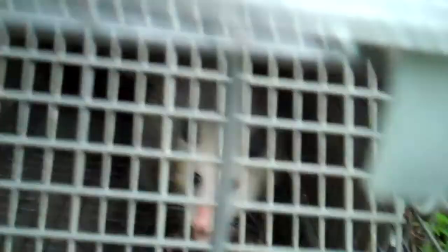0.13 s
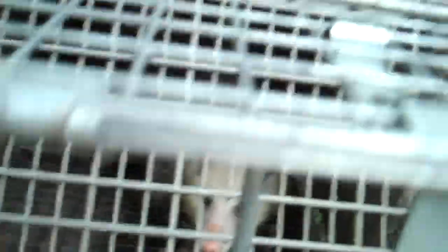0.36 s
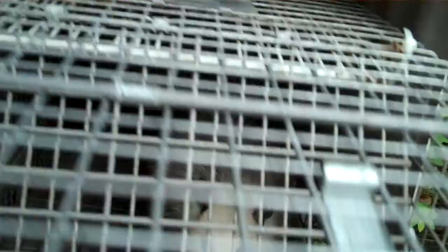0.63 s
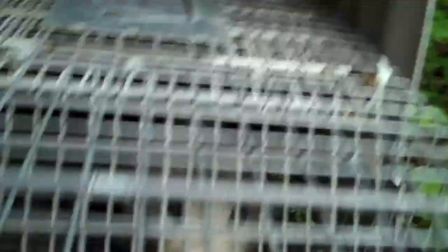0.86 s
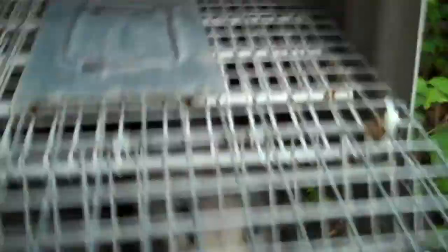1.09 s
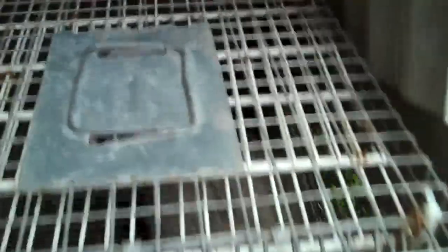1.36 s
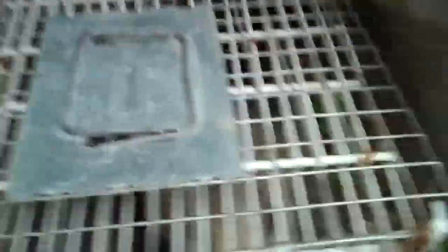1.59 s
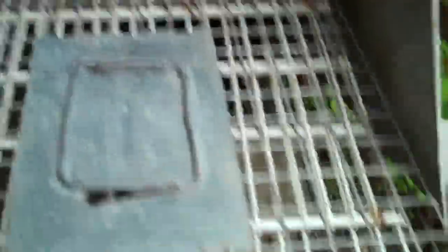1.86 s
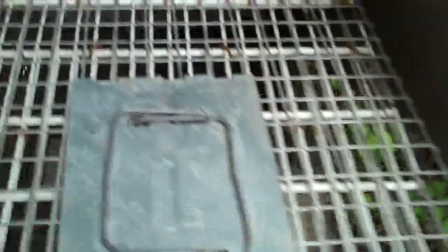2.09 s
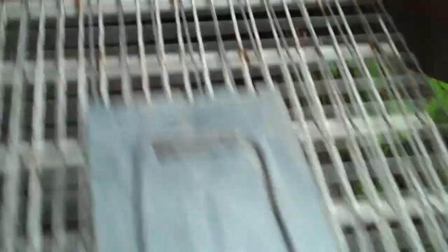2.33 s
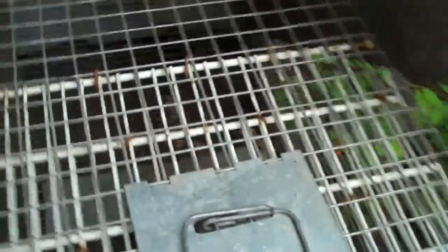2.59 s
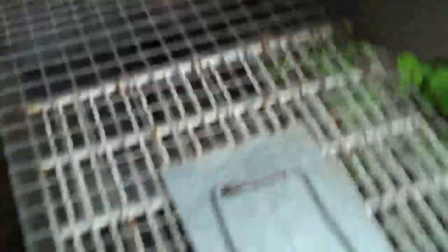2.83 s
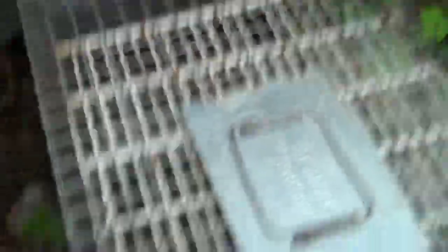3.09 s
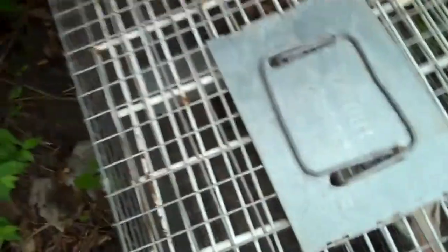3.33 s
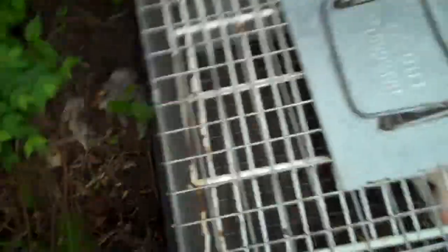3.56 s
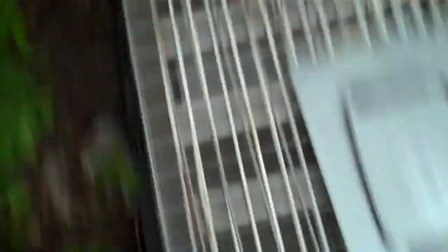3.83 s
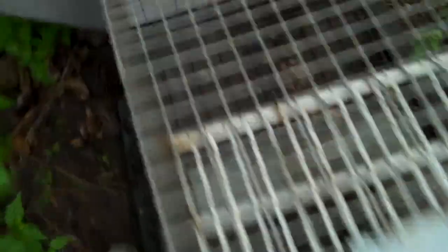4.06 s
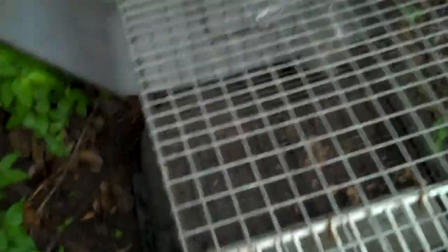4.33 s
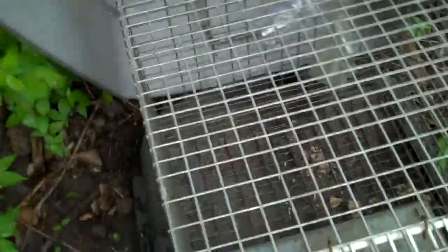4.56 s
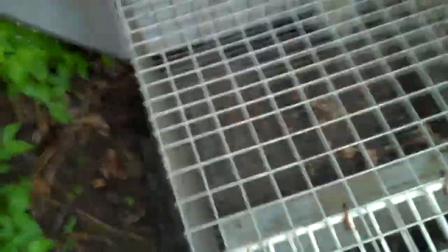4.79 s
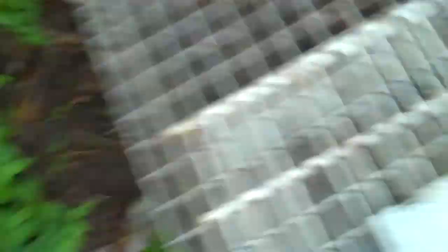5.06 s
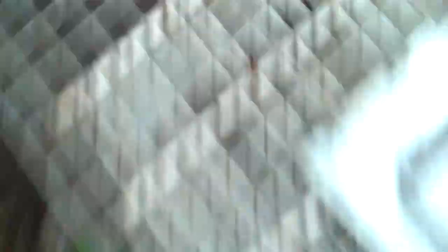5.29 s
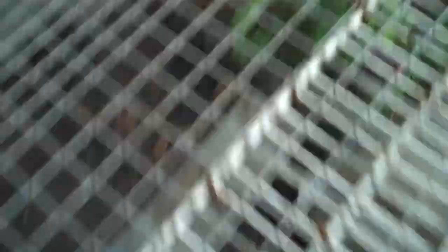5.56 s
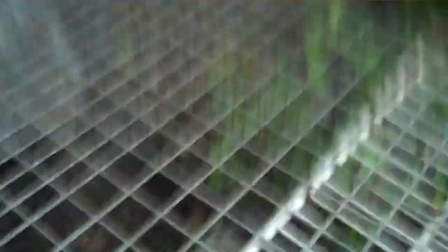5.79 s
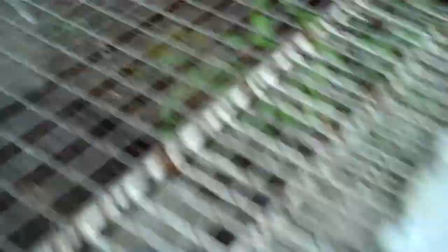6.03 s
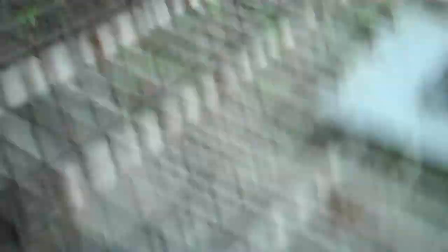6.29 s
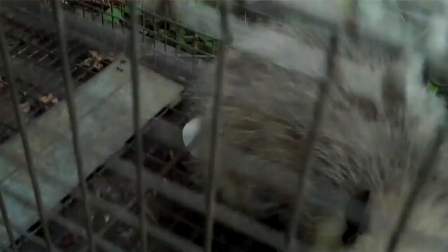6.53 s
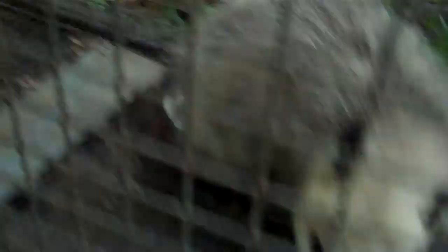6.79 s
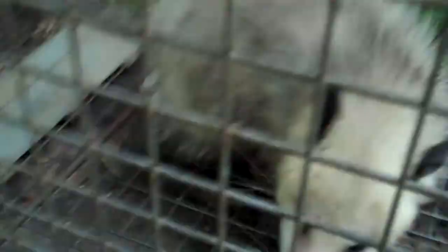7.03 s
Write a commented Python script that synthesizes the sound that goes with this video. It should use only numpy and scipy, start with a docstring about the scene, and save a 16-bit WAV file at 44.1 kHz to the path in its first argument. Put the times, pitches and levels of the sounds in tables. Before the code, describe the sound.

A wire cage is carried through long grass, with dry swishes, crackling ticks, dull frame thuds and a muffled finger creaking on the microphone.

```python
"""A wire cage is lifted and carried through long grass, heard by a hand-held camera.
It opens on a grass sweep and mesh rubs; thuds of the ringing frame and knocks on the wires soon join in.
Something hollow slides by near 3.9 s, the hardest thud falls at 4.3 s, and the grass is loudest from 5.2 to 5.9 s.
Bright stem ticks crowd the end. Sweeps and rubs are shaped noise, clicks are noise bursts, thuds are decaying sines.
Right: an open port ringing near 6 kHz. Left: a port muffled by a finger, which creaks throughout and taps
now and then from 1.6 s on."""
import sys
import numpy as np
from scipy import signal
from scipy.fft import rfft, irfft
from scipy.io import wavfile
from scipy.ndimage import uniform_filter1d

SR = 44100
rng = np.random.default_rng(int(sys.argv[2]) if len(sys.argv) > 2 else 0)


def to_linear_factor(level_db):
    """Convert decibel levels (scalar or array-like) to linear amplitude factors."""
    exponent = np.asarray(level_db, float) / 20
    return 10 ** exponent


def bounce(signal):
    """Save signal as a 16-bit WAV file at the path given by the first command-line argument."""
    frames = np.transpose(np.atleast_2d(signal))
    limited = np.clip(frames, -1, 1)
    pcm = np.round(limited * 32767).astype(np.int16)
    wavfile.write(sys.argv[1], SR, pcm)


N = 315315

# All source levels are ahead of the port and the output gains.
# Capsule self noise. Each row: frequency in Hz, density in dB per Hz.
HISS_SPECTRUM = [(40, -87.5), (100, -91), (300, -91.5), (800, -93), (2000, -97), (5000, -101), (9000, -105),
                 (13000, -107)]
# Finger rubbing on the left port. Each row: time in seconds, level in dB.
FINGER_RUB = [(0.0, -71), (0.5, -82), (1.0, -61), (2.3, -79), (3.3, -68), (4.0, -77), (4.5, -84.5),
              (5.0, -64), (6.0, -56), (7.15, -71)]
# Loudest finger taps. Each row: time in seconds, strength in dB of the impulse that rings the cavity.
FINGER_TAPS = [(1.634, -3), (1.783, -2.5), (5.059, -2), (5.511, -12), (5.799, -8), (6.011, -8), (6.065, -5),
               (6.313, 5), (6.359, -8), (6.916, -15)]
# Something hollow slides along the cage. Each row: peak in seconds, level in dB, rise and fall in seconds per 10 dB.
SLIDES = [(3.91, -47.5, 0.14, .16)]
# Its resonances. Each row: frequency in Hz, width in Hz, level in dB.
HOLLOW_MODES = [(610, 320, 1.5), (1400, 510, 1), (1900, 100, -5.5)]
# The mesh panel is rubbed. Each row: peak in seconds, level in dB, rise and fall in seconds per 10 dB.
MESH_RUBS = [(.1, -41.5, 0.073, 0.02), (.38, -46.5, 0.05, -0.35), (.7, -50.5, 0.3, 0.18),
             (4.25, -38, 0.033, -0.41)]
# The frame shakes as it is shifted or drags. Each row: peak in seconds, rumble in dB, rise and fall in s per 10 dB.
FRAME_SHAKES = [(.05, -44, 0.1, 0.19), (.37, -54, .1, 0.08), (.78, -43, 0.15, 0), (1.36, -51, 0.32, -0.02),
                (1.92, -36, 0.08, 0.0859), (2.84, -59, .02, 0.16), (3.28, -60, 0.12, .15),
                (3.8, -51, .12, .1), (4.33, -39, 0.044, -0.07), (4.78, -51, 0.13, -0.1),
                (5.09, -43.5, .04, -0.15), (5.3, -44, 0.074, 0.2), (5.79, -44.5, 0.099, 0.2),
                (6.12, -58, 0.16, 0)]
# Blows on the frame. Each row: start in seconds, level in dB, settled pitch in Hz.
BLOWS = [(0.752, -27, 398), (0.789, -24, 141), (1.899, -25, 104), (1.96, -25.5, 103), (2.002, -22.5, 407),
         (2.03, -35, 75), (2.822, -23.5, 269), (2.84, -39.5, 80.4), (3.107, -35.5, 354),
         (3.572, -29.5, 493), (3.775, -17.5, 250), (4.274, -22, 290), (4.308, -14.5, 210.5),
         (4.349, -23, 216), (4.37, -34.5, 84.3), (4.578, -34.5, 296), (4.674, -19.5, 255),
         (4.699, -31.5, 127), (4.79, -40, 95), (6.517, -44, 105), (6.66, -41.5, 214)]
# Frame modes. Each row: multiple of the settled pitch, level in dB, share of the blow's 60 dB decay time.
FRAME_MODES = [(.6, -2, 0.49), (1.007, -5.5, 1.23), (2.05, -3, 0.3), (3.3, -4.5, 0.21)]
# Loudest bright ticks of stems on wire. Each row: start in seconds, peak of the sharp part in dB.
STEM_TICKS = [(0.672, -27), (0.684, -26.5), (0.705, -26), (0.8258, -31.5), (0.9122, -30), (1.093, -28),
              (1.2825, -23.5), (1.367, -25), (1.4988, -24), (2.0522, -26), (2.6396, -23.5), (5.2027, -26),
              (5.2305, -16.5), (5.2483, -11), (5.3323, -15), (5.8195, -11), (5.8974, -14.5), (6.001, -23),
              (6.0128, -17.5), (6.0434, -12), (6.1204, -11.5), (6.132, -15), (6.1573, -14.5), (6.2222, -17),
              (6.327, -18), (6.3505, -20), (6.562, -22), (6.5842, -21.5), (6.5963, -23), (6.6157, -25),
              (6.6573, -30), (6.7907, -26.5), (6.8261, -21), (6.9107, -28), (6.995, -26), (7.0336, -24.5)]
# Knocks on the wires. Each row: start in seconds, sharp peak in dB, dull peak in dB, dull centre in Hz.
WIRE_KNOCKS = [(0.3227, -52, -28.5, 1590), (0.3671, -43, -26.5, 1100), (0.757, -50, -24.5, 597),
               (0.786, -50, -28, 680), (0.9848, -25, -29, 1660), (1.0322, -24.5, -31, 1200),
               (1.412, -22, -24, 1400), (1.4388, -19.5, -34.5, 2200), (1.6308, -20, -26.5, 1600),
               (1.8588, -34, -14.5, 2870), (1.879, -25, -29, 2500), (1.894, -32, -33, 3000),
               (1.913, -37, -26.5, 3480), (1.9424, -25, -21, 2000), (1.955, -32, -19.5, 1070),
               (2.006, -36, -26, 800), (2.1632, -29, -34, 2000), (2.4554, -32, -29.5, 2960),
               (2.4717, -40, -32, 1400), (2.8225, -34, -24.5, 1100), (3.1129, -47, -28.5, 734),
               (3.2986, -24, -24, 1100), (3.4264, -18, -22, 2570), (3.7772, -27, -13.5, 1200),
               (4.3039, -19, -8.5, 1420), (4.5743, -32, -26, 1900), (4.915, -42, -26.5, 1290),
               (5.2709, -8, -20, 1100), (5.354, -15, -25, 1100), (5.4372, -32, -23.5, 1090),
               (5.4861, -9.5, -15, 1980), (5.666, -14.5, -17, 1310), (6.0572, -17, -25.5, 1080),
               (6.3001, -22, -32.5, 1000), (6.9152, -27, -31.5, 1400), (7.0042, -21, -26.5, 1290)]
# How the grass moves over the mesh. Each row: time in seconds, smoothness from 0 dry ticks to 1 dragging swish.
SMOOTHNESS = [(0, 0.55), (.85, 0.62), (1.0, 0.38), (1.7, 0.38), (2.3, 0.65), (3.3, 0.33), (4.5, 0.64),
              (5.1, 0.43), (5.85, 0.44), (6.0, 0.29), (7.15, 0.14)]
# Sweeps through the grass. Each row: peak in seconds, blade rustle in dB, rise and fall in seconds per 10 dB,
# stem scrape in dB above the rustle.
GRASS_SWEEPS = [(0.0, -35.5, 0.059, 0.07, -3.5), (0.069, -33, 0.0086, 0.05, -3),
                (.16, -46, 0.098, 0.2, -1.5), (0.37, -43, .1, 0.04, -4), (0.757, -39.5, 0.17, 0, -3.5),
                (0.861, -42.5, 0.028, -0.23, -8), (1.2, -36.5, 0.21, 0.16, -7.5),
                (1.399, -35, 0.056, 0.06, -8.5), (1.63, -38, 0.19, 0.21, -11),
                (1.88, -37, .03, 0.0766, 2.5), (1.99, -35, 0.072, 0.12, -10),
                (2.48, -41.5, 0.24, 0.28, -12.5), (2.84, -44.5, 0.093, 0.2, -13.5),
                (3.262, -33, 0.094, 0.14, -10.5), (3.668, -29, 0.081, 0.13, -11),
                (4.3, -38, 0.27, 0.35, -7.5), (4.67, -33.5, 0.015, -0.07, -7),
                (4.761, -31, 0.054, 0.06, -12.5), (4.881, -39.5, 0.17, 0.03, -12),
                (4.919, -43.5, 0.028, 0.02, 1.5), (5.092, -31.5, 0.034, -0.03, -6.5),
                (5.3, -22.5, .11, 0.1575, -8), (5.751, -21.5, .11, 0.13, -9.5),
                (6.12, -31.5, 0.16, 0.32, -11.5), (6.57, -39, 0.26, 0.02, -11),
                (6.72, -45, 0.064, .06, -10.5), (7.01, -42, 0.21, 0.05, -11)]
# Blade rustle by range. Each row: low edge in Hz, high edge in Hz, level in dB.
RUSTLE_BANDS = [(2410, 4530, -10.5), (4020, 8080, -11.0), (8200, 19845, -7.5)]
# Stem scrape by range. Each row: low edge in Hz, high edge in Hz, level in dB, extra dB per dB of scrape above -9.
SCRAPE_BANDS = [(339, 1210, -3, 0.48), (1026, 2590, -2.0, -0.094)]

STIR_DB, STIR_SCRAPE_DB, STIR_RUMBLE_DB = -56, -6, -68.5  # faint stirring; the scrape is relative to the rustle
THUD_T60_S, THUD_T60_SLOPE, THUD_SWELL_S = 0.085, 0.82, 0.0034  # times at 250 Hz; lower blows ring longer
TICK_DULL_DB, TICK_DULL_HZ = -20, 1400  # dull part of a tick, relative to its sharp peak
DULL_SPAN = 1.91  # the dull part reaches from its centre over this to its centre times this
PORT_HZ, PORT_WIDTH_HZ, PORT_DB = 6030, 1060, 17  # cavity resonance of the open port
COVER_HZ, COVER_TOP_HZ = 80.5, 1200  # low-passes for what leaks past the finger
OVERLOAD = 0.84  # full-scale share where the right side saturates


def band(x, low_hz, high_hz):
    """Butterworth band-pass."""
    return signal.sosfilt(signal.butter(2, [low_hz, high_hz], "band", fs=SR, output="sos"), x)


def one_pole(x, hz):
    """Gentle low-pass."""
    r = np.exp(-2 * np.pi * hz / SR)
    return signal.lfilter([1 - r], [1, -r], x)


def resonance(x, hz, width_hz):
    """Two-pole resonance with a gain of about 1 at its top."""
    r = np.exp(-np.pi * width_hz / SR)
    poles = [1, -2 * r * np.cos(2 * np.pi * hz / SR), r * r]
    return signal.lfilter([(1 - r * r) / 2, 0, (r * r - 1) / 2], poles, x)


def in_time(rows):
    """Second table column as a curve over time, one value a sample."""
    s, values = np.transpose(rows)
    return np.interp(np.arange(N) / SR, s, values)


def evened(x, over_s):
    """Local rms brought to 1."""
    power = np.abs(uniform_filter1d(x ** 2, size=int(over_s * SR)))
    return x / np.sqrt(power + 1e-14)


def swells(rows):
    """Level in dB of each row over time: a steady climb to its peak, then a steady fall."""
    s, db, rise_s, fall_s = (np.array(rows)[:, k:k + 1] for k in range(4))
    t = np.arange(0, N + 64, 64) / SR - s  # one value per 64 samples
    fall_s = np.maximum(fall_s, 0.005)  # zero or negative entries drop abruptly
    return db - 10 * np.where(t < 0, -t / rise_s, t / fall_s)


def summed(levels_db, rest_db):
    """Powers of all swells and a resting level added, in dB, one value a sample."""
    power = np.sum(to_linear_factor(levels_db) ** 2, axis=0) + to_linear_factor(rest_db) ** 2
    total_db = 10 * np.log10(power)
    return np.interp(np.arange(N) / 64, np.arange(len(total_db)), total_db)


def grains(per_s, spread_db, last_s):
    """Envelope of random short bursts; a few are much larger, and they come in clumps."""
    clumps = evened(one_pole(one_pole(rng.standard_normal(N), 25), 25), 1)
    born = rng.random(N) < per_s * to_linear_factor(6.0 * clumps) / SR
    sizes = to_linear_factor(spread_db * np.minimum(rng.exponential(1, N), 4.2))
    return signal.lfilter([1], [1, -np.exp(-1 / (last_s * SR))], born * sizes + 1e-9)


def hiss():
    """Self noise of the capsule: steady noise shaped to its spectrum."""
    hz, db = np.transpose(HISS_SPECTRUM)
    grid_hz = np.linspace(1, SR / 2, N // 2 + 1)
    shape = to_linear_factor(np.interp(np.log(grid_hz), np.log(hz), db)) * np.sqrt(SR / 2)
    return irfft(rfft(rng.standard_normal(N)) * shape, N)


def finger():
    """Skin creaks in clumped slips and taps on the small cavity under the finger, which resonates."""
    slips = grains(190.0, 2.6, 0.002) * rng.standard_normal(N)
    creak = evened(resonance(resonance(slips, 650, 400), 720, 900), 0.39)
    taps = np.zeros(N)
    for s, db in FINGER_TAPS:
        taps[round(s * SR)] = to_linear_factor(db)
    return to_linear_factor(in_time(FINGER_RUB)) * creak + resonance(one_pole(taps, 1400), 410, 780)


def slide():
    """Sliding friction noise excites a few hollow resonances."""
    friction = rng.standard_normal(N)
    modes = np.zeros(N)
    for hz, width_hz, db in HOLLOW_MODES:
        mode = resonance(resonance(friction, hz, width_hz), hz, width_hz)
        modes += to_linear_factor(db) * evened(mode, 0.58)
    return to_linear_factor(summed(swells(SLIDES), -99)) * modes


def panel():
    """Rubbing the mesh panel puts friction noise through one narrow mode."""
    mode = resonance(resonance(rng.standard_normal(N), 461, 48), 416, 90)
    return to_linear_factor(summed(swells(MESH_RUBS), -99)) * evened(mode, 0.2)


def frame_rumble():
    """The shifted frame shakes in lumps: low noise under a grainy envelope."""
    lumps = grains(60.0, 1.9, 0.013) + 1.0
    rumble = evened(band(lumps * rng.standard_normal(N), 85, 373), 0.08)
    return to_linear_factor(summed(swells(FRAME_SHAKES), STIR_RUMBLE_DB)) * rumble


def thuds():
    """A soft blow sets the frame modes ringing; the pitch sags as the wires slacken, and loose parts rattle."""
    length = 16384
    out, t = np.zeros(N + length), np.arange(length) / SR
    sagging_t = t + 0.27 * 0.016 * (1 - np.exp(-t / 0.015))  # time runs fast at first
    for s, db, hz in BLOWS:
        t60 = THUD_T60_S * (250 / hz) ** THUD_T60_SLOPE
        rattle = band(rng.standard_normal(length), hz / 2, 2 * hz)
        ring = to_linear_factor(0.5 - 30 * t / t60) * rattle
        for multiple, level_db, share in FRAME_MODES:
            decay = to_linear_factor(level_db - 60 * t / (t60 * share))
            ring += decay * np.sin(2 * np.pi * hz * multiple * sagging_t)
        swell = 1 - np.exp(-(t * hz / 250 / THUD_SWELL_S) ** 2)  # low blows build up later
        at = round(s * SR)
        out[at:at + length] += to_linear_factor(db) * ring * swell
    return out[:N]


def clicks():
    """Stems and wires click: a sharp burst under a millisecond with a faint tail, and a longer dull part."""
    length = 2048
    out, t = np.zeros(N + length), np.arange(length) / SR
    ticks = [(s, db, db + TICK_DULL_DB, TICK_DULL_HZ) for s, db in STEM_TICKS]
    for s, sharp_db, dull_db, hz in list(WIRE_KNOCKS) + ticks:
        sharp_decay = np.exp(-t / 0.0006) + 0.051 * np.exp(-t / 0.005)
        dull_decay = np.exp(-t * np.sqrt(hz / 1100) / 0.0055)  # higher dull parts die sooner
        sharp = band(rng.standard_normal(length) * sharp_decay, 2860, 11800)
        dull = band(rng.standard_normal(length) * dull_decay, hz / DULL_SPAN, hz * DULL_SPAN)
        at = round(s * SR)
        out[at:at + length] += to_linear_factor(sharp_db) * sharp / np.abs(sharp).max()
        out[at:at + length] += to_linear_factor(dull_db) * dull / np.abs(dull).max()
    return out[:N]


def grass():
    """Blades and stems share their slips over the mesh; each pitch range has some slips of its own."""
    sweeps_db, stems_db = swells(GRASS_SWEEPS), np.array(GRASS_SWEEPS)[:, 4:]
    rustle_db = summed(sweeps_db, STIR_DB)
    scrape_db = summed(sweeps_db + stems_db, STIR_DB + STIR_SCRAPE_DB) - rustle_db
    smooth = in_time(SMOOTHNESS)
    per_s = 1700.0 * smooth  # few dry ticks when the stems part, a dense swish when they drag
    shared = (1.5 - smooth) * grains(220.0, 4.57, 0.00051)
    out = np.zeros(N)
    for low_hz, high_hz, db in RUSTLE_BANDS:
        slips = shared + 0.69 * grains(per_s, 1.8, 0.00038) + 1.47 * smooth
        rustle = band(slips * rng.standard_normal(N), low_hz, high_hz)
        out += to_linear_factor(rustle_db + db) * evened(rustle, 0.1)
    for low_hz, high_hz, db, tilt in SCRAPE_BANDS:  # thick stems scrape darker
        slips = 0.64 * shared + 0.54 * grains(per_s * 0.3, 4.0, 0.002) + 1.85 * smooth
        scrape = band(slips * rng.standard_normal(N), low_hz, high_hz)
        level_db = rustle_db + scrape_db + db + tilt * (scrape_db + 9.0)
        out += to_linear_factor(level_db) * evened(scrape, 0.15)
    return out


def scene():
    """First row: touch on the covered left port. Second row: air sound around the cage."""
    air = slide() + panel() + frame_rumble() + thuds() + clicks() + grass()
    return np.array([finger(), air])


def low_pass(x):
    """Removes everything above the highest recorded frequency."""
    return signal.sosfilt(signal.butter(12, 15430, fs=SR, output="sos"), x)


def record(dry):
    """Open port rings and overloads softly on the right, sound leaks past the finger on the left; both hiss."""
    touch, air = dry
    right = air + to_linear_factor(PORT_DB) * resonance(air, PORT_HZ, PORT_WIDTH_HZ)
    treble_loss = signal.butter(2, 7500, fs=SR, output="sos")
    right = to_linear_factor(6.0) * signal.sosfilt(treble_loss, right) + to_linear_factor(3.0) * hiss()
    right = OVERLOAD * np.tanh(right / OVERLOAD)
    leak = one_pole(one_pole(air, COVER_HZ), COVER_TOP_HZ)
    left = leak + touch + hiss()
    top_cut = signal.cheby2(10, 30, 14800, fs=SR, output="sos")
    mix = signal.sosfilt(top_cut, np.array([left, right]))
    return low_pass(mix)


dry = scene()
out = record(dry)
bounce(out)
```